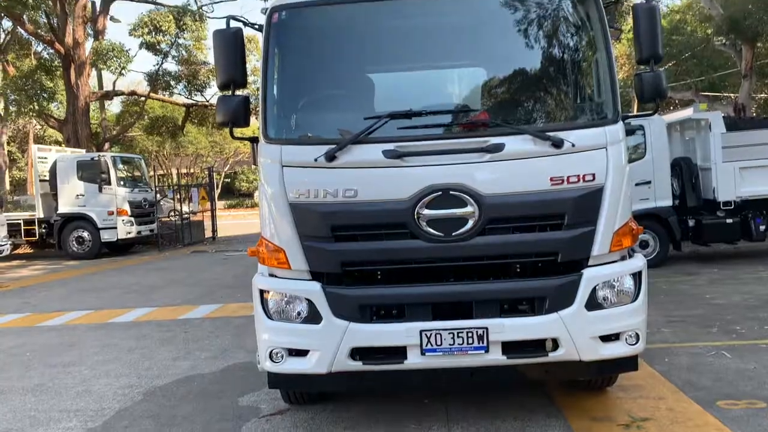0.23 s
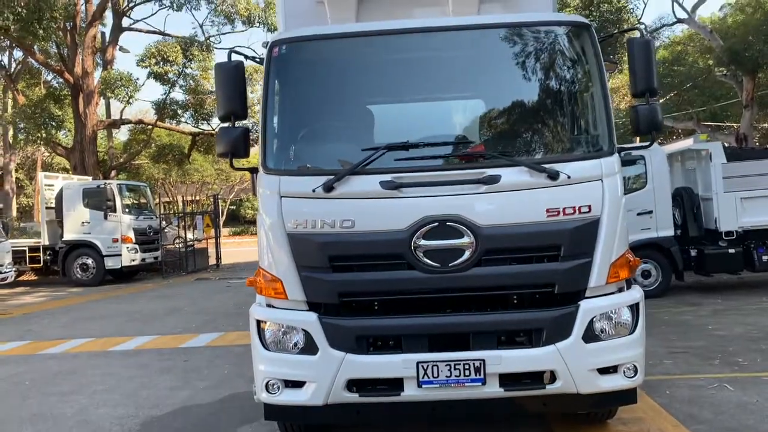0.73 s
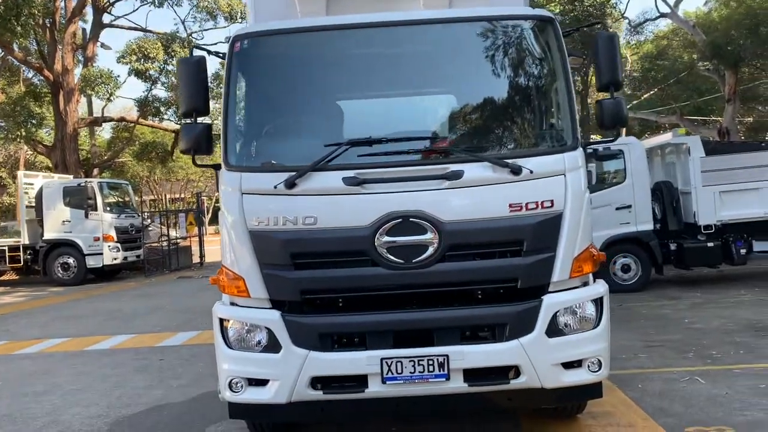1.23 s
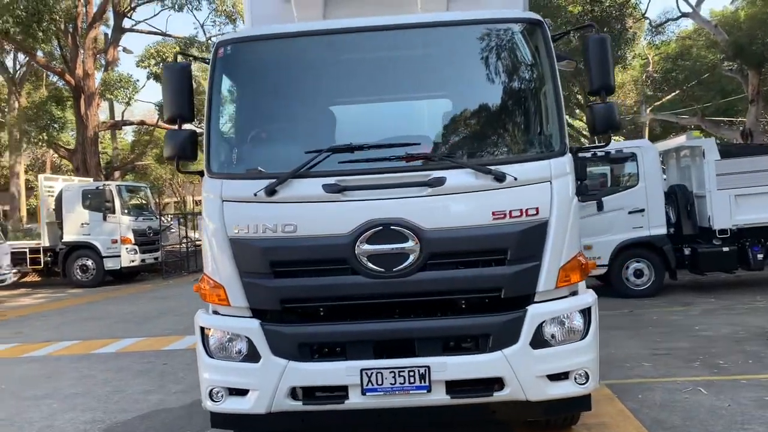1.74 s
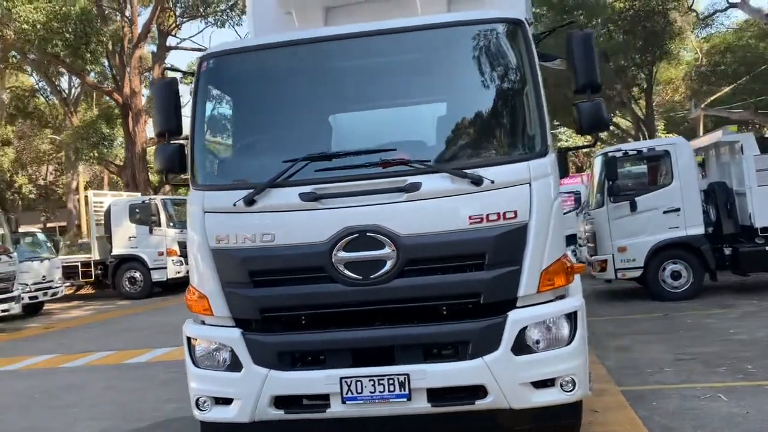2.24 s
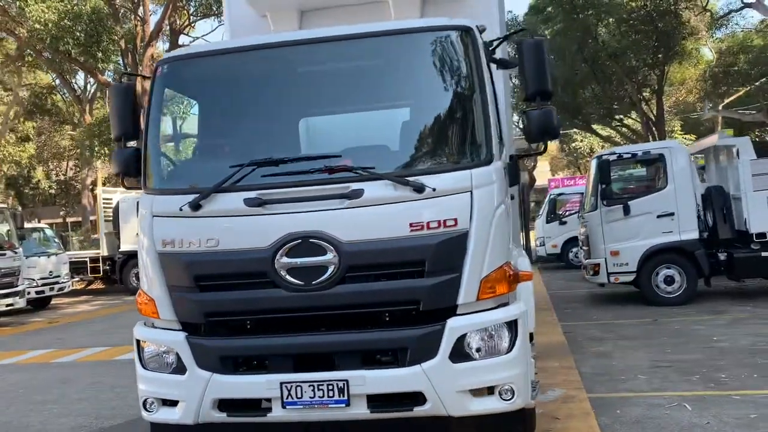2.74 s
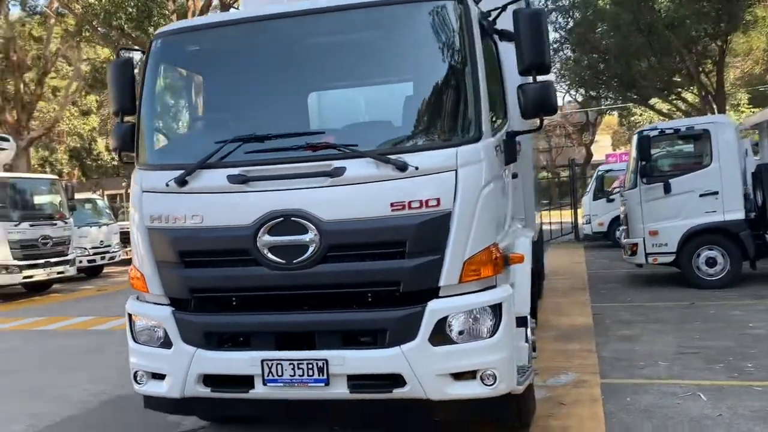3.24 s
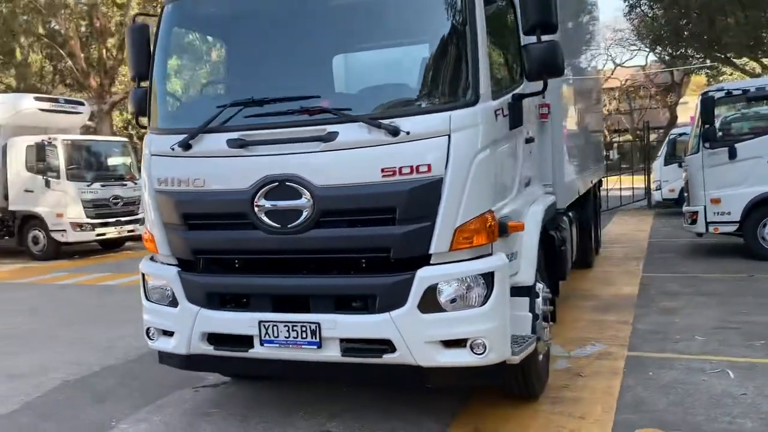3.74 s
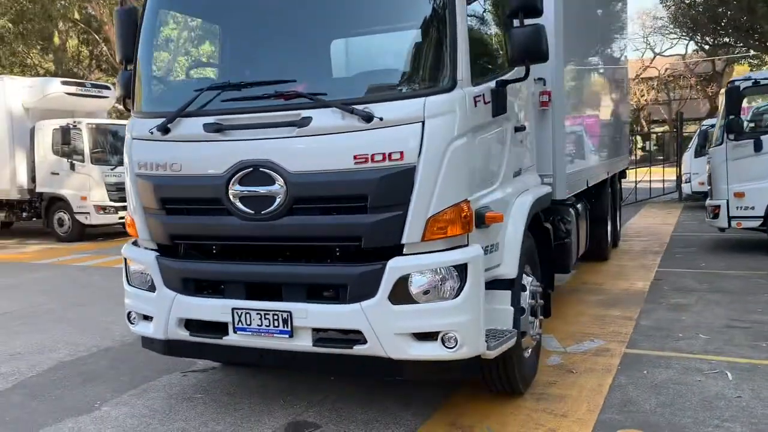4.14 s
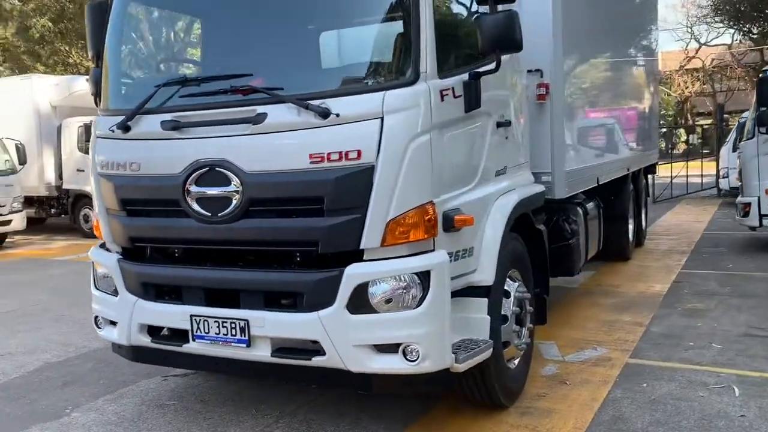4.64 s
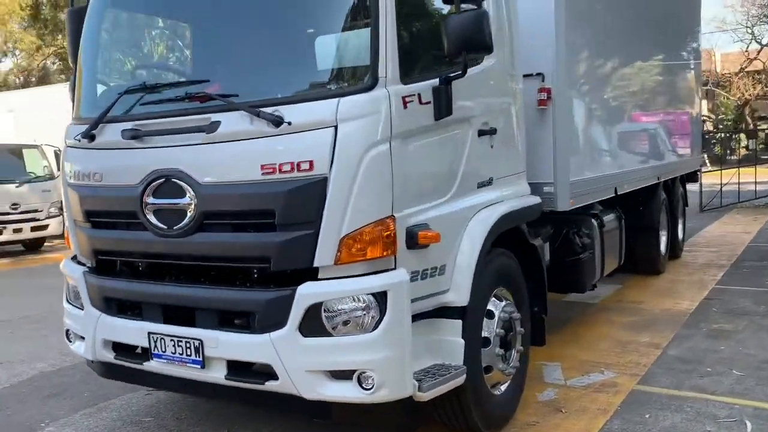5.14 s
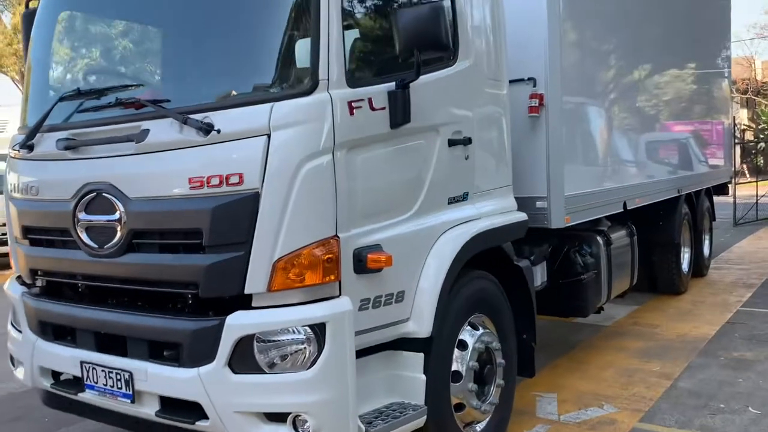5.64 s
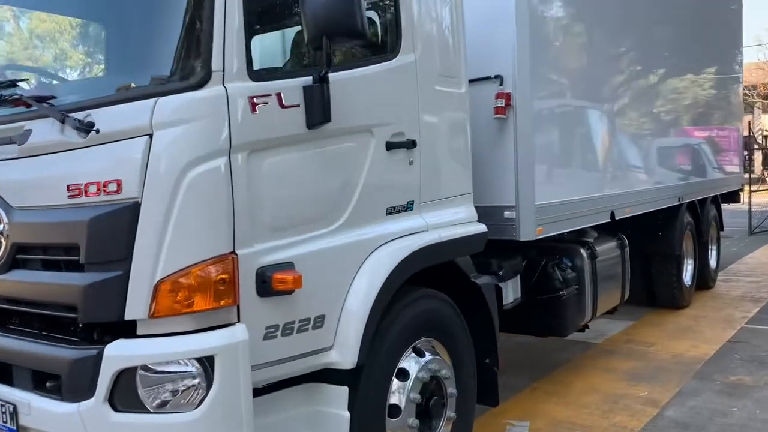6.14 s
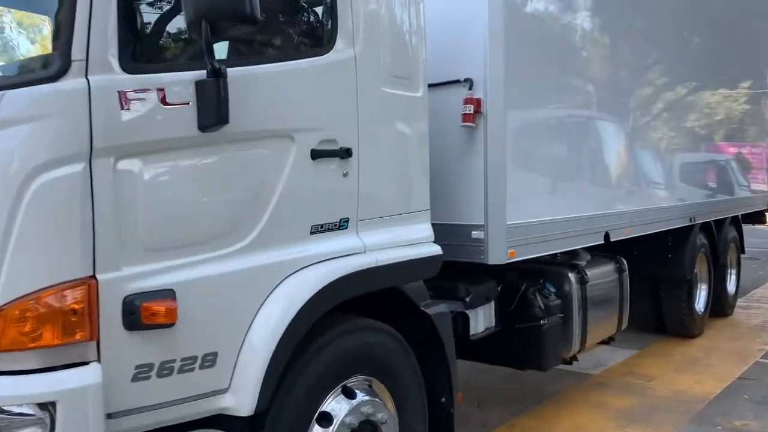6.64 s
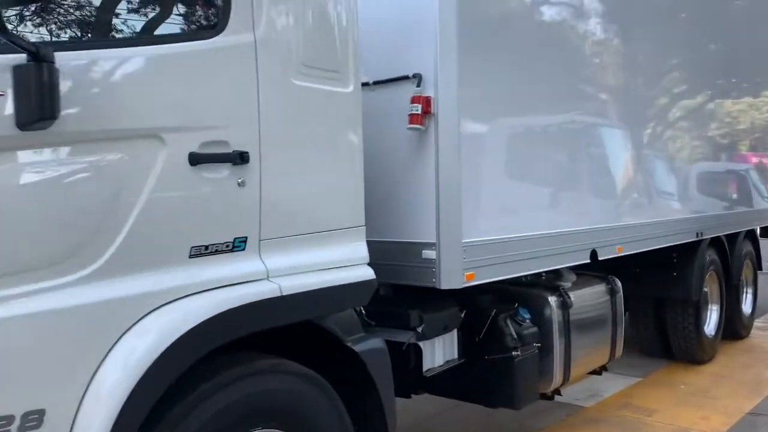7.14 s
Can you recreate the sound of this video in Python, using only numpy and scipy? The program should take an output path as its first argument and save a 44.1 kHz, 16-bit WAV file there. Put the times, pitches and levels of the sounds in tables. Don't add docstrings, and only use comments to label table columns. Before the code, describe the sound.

After a tiny silence, sound opens abruptly on an outdoor truck yard: deep traffic rumble, a light high hiss, a parked diesel idling low and a steady, mellow fan hum with thin belt whines. From about 1.5 s a heavy truck pulls away, its low exhaust boom and dry engine clatter rising in pitch until roughly 4.2 s, strongest around 2.5 to 4. The high hiss thins out from 3.4 to 5 s. Two faint ticks fall at 3.3 and 3.9. At a gear change the pitch sags to 4.8 and the fan hum stops. A short air puff comes at 4.9; the second climb runs 5 to 6.3 with hollow exhaust bark, turbo whistle and gear whine. A sharp close metal tick, slightly right, hits at 5.4, a fainter puff at 5.7. Pitch drops again by 6.9, then the engine pulls anew, with road roar swelling, cut off near 7.4.

```python
import sys
import numpy as np
from scipy import signal
from scipy.fft import rfft, irfft, next_fast_len
from scipy.io import wavfile
from scipy.ndimage import uniform_filter1d, map_coordinates

SR = 44100
rng = np.random.default_rng(int(sys.argv[2]) if len(sys.argv) > 2 else 0)


def gain_from_decibels(decibels):
    exponent = np.asarray(decibels, float) / 20
    return 10 ** exponent


def persist_wave(psi):
    counts = np.round(np.clip(psi, -1, 1) * 32767).astype(np.int16)
    wavfile.write(sys.argv[1], SR, np.atleast_2d(counts).T)


N = 325899

# t/s, firing f/Hz, exhaust boom level/dB,
# exhaust overtone level/dB, engine load level/dB
TRUCK = [(1.45, 51, -18, -20, -52), (1.68, 53.07, -1, -0.5, -56), (2.27, 54, -3.5, -1, -42.5),
         (2.42, 61.64, 0, -2.5, -37.5), (2.85, 66.25, -1, 1, -34), (3, 70.5, -7, 0, -34.5),
         (3.12, 73.52, -2.5, -3.5, -34), (3.6, 80.4, 0, -1, -34.5), (4.121, 84.6, -2.5, -9, -33.5),
         (4.26, 84.44, -25, -11.5, -38), (4.8, 71.89, -27, -12, -42.5), (5.1, 72.7, -6.5, -1, -38),
         (5.55, 78.2, -12.5, 0.5, -37.5), (6.15, 85.8, -13.5, 1, -39.5), (6.4, 85.55, -28, -19, -40),
         (6.85, 71, -21, -19.5, -44), (7.201, 73.83, -21, 0.5, -43.5), (7.39, 73.1, -5.5, -2, -43)]


def unit(x):
    return x / np.sqrt(np.mean(x ** 2) + 1e-20)


def along(points, hz):
    f, v = np.transpose(points)
    return np.interp(np.log(hz + 1), np.log(f + 1), v)


def curves(rows):
    s, *cols = np.transpose(rows)
    return [np.interp(np.arange(N) / SR, s, c) for c in cols]


def finely(rows):
    s, *cols = np.transpose(rows)
    t = np.arange(s[0], s[-1] + .01, .02)
    return [t] + [np.interp(t, s, c) for c in cols]


def wobble(rate, count=N):
    steps = np.arange(0, count + 16, 16)
    knots = rng.standard_normal(int(count * rate / SR) + 4)
    coarse = map_coordinates(knots, [steps * rate / SR])
    return np.interp(np.arange(count), steps, coarse)


def filtered(x, response):
    m = next_fast_len(N + SR // 4)
    return irfft(rfft(x, m) * response(np.fft.rfftfreq(m, 1 / SR)), m)[..., :N]


def modes(rows):
    def response(f):
        total = 0
        for k, (centre, width, db) in enumerate(rows):
            damping = 1j * f * width
            total = total + (-1) ** k * gain_from_decibels(db) * damping / (centre * centre - f * f + damping)
        return total
    return response


def patchy(patchy_db):
    z = signal.stft(rng.standard_normal((2, N)), nperseg=1024)[2]

    def smooth(bins, frames):
        grain = uniform_filter1d(rng.standard_normal(z.shape[1:]), size=bins, axis=0)
        return unit(uniform_filter1d(grain, size=frames, axis=1))
    gain = gain_from_decibels(patchy_db * smooth(12, 4) + 2.45 * smooth(2, 14))
    return signal.istft(z * gain, nperseg=1024)[1][:, :N]


def shaped(spectrum):
    return unit(filtered(patchy(0.96), lambda f: gain_from_decibels(along(spectrum, f))))


def drone(rows, drift_hz, flutter_db, flutter_rate):
    s, *cols = np.transpose(rows)
    span = np.arange(max(int((s[0] - .04) * SR), 0), min(int((s[-1] + .04) * SR), N))
    t, out = span / SR, np.zeros(N)
    hz, *levels = (np.interp(t, s, c) for c in cols)
    shake = lambda: wobble(flutter_rate, count=len(span))
    turn = 2 * np.pi * np.cumsum(hz + drift_hz * shake()) / SR
    tones = sum(gain_from_decibels(db + flutter_db * shake()) * np.sin((k + 1) * turn) for k, db in enumerate(levels))
    to_end = t[-1] - t + (span[-1] == N - 1)
    out[span] = np.sqrt(2) * tones * np.clip(np.minimum(t - t[0], to_end) / 0.083, 0, 1)
    return out


def clatter(firing_hz, body, depth):
    cycle = np.cumsum(firing_hz + 3 * wobble(22)) / SR % 1
    knock = 1 + depth * gain_from_decibels(3.9 * wobble(40)) * np.exp(-cycle / 0.75)
    return unit(filtered(knock * patchy(2.0), lambda f: modes(body)(f) * f ** 2 / (f ** 2 + 1200 ** 2)))


def air_hiss():
    # t/s, level/dB
    air = [(0, -59), (2.1, -59), (2.35, -55.5), (3.05, -52), (3.45, -67.5), (4.2, -76), (5.05, -74),
           (5.35, -55), (6.3, -56.5), (7.39, -56)]
    # f/Hz, level/dB per Hz
    fizz = [(5000, -25), (7500, 2), (9500, 0), (12000, -3.5), (13500, -4), (14500, -5), (15700, -19)]
    return gain_from_decibels(curves(air)[0] + 0.5 + 0.41 * wobble(2.77)) * shaped(fizz)


def road(gust):
    # t/s, level/dB
    passage = [(0, -34.5), (.8, -34.5), (1.05, -32), (1.5, -34), (2, -32), (2.35, -30.5), (2.75, -28.5),
               (3.1, -29), (4.1, -29.5), (4.4, -30.5), (4.8, -31.5), (5.45, -27.5), (6, -26.5),
               (6.35, -27.5), (6.95, -30.5), (7.39, -27)]
    # f/Hz, level/dB per Hz
    rumble = [(15, -31), (30, -43), (45, -8), (65, 5), (100, 0.5), (150, -6.5), (220, -11), (320, -27.5),
              (500, -63)]
    roar = [(150, -0.5), (250, -3.5), (400, -2.5), (600, -5.5), (1000, -4.5), (1400, -11), (2200, -19.5),
            (3000, -78)]
    hiss = [(1500, -20.5), (2800, 2.5), (3300, 4), (3900, -4.5), (4700, -1), (5500, -4), (7000, -10.5),
            (8500, -19), (10500, -33), (11500, -48)]
    roar_db, = curves(passage)
    swing_db = roar_db + 31
    rumble_db = -27.5 + 0.61 * swing_db + 1.9 * wobble(4.5)
    hiss_db = -44 + 0.76 * swing_db + 0.3 * gust
    return (gain_from_decibels(rumble_db) * shaped(rumble) + gain_from_decibels(roar_db + 1.0 + 0.86 * gust) * shaped(roar)
            + gain_from_decibels(hiss_db) * shaped(hiss))


def swell(s, length, first_hz, last_hz, db):
    share = np.array([0, 0.38, 0.62, 1])
    level_db = db - 10.5 * np.array([1, 0, 0, 1])
    return np.transpose([s + share * length, first_hz + share * (last_hz - first_hz), level_db])


def passing_tones():
    passing = [(0.081, 1.36, 60.5, 61, -31.5), (.85, 0.35, 204, 205.8, -34.5), (0.852, .4, 47, 47, -35),
               (2.379, 0.63, 226, 240.1, -34.5), (4.48, .35, 72.4, 65.2, -29), (0.881, 0.24, 66, 68, -30),
               (3.648, .55, 107, 113.2, -28.5), (4.153, 0.75, 113, 104, -31.5), (5, 1.4, 234, 287, -37.5),
               (5.8, 0.31, 312, 310, -32.5), (6.419, 0.48, 126, 114.2, -26),
               (6.9, 0.23, 113.5, 111.9, -24.5)]
    return sum(drone(swell(*row), drift_hz=0.78, flutter_db=4.3, flutter_rate=8) for row in passing)


def valve():
    # t/s, level/dB, f/Hz, width/Hz, length t/s
    puffs = [
        (4.932, -41, 4220, 700, 0.069),
        (4.935, -50, 6470, 5000, .07),
        (5.66, -51, 3600, 1500, .04),
    ]
    out, t = np.zeros(N + SR), np.arange(SR // 6) / SR
    for s, db, hz, width_hz, length in puffs:
        noise = rng.standard_normal(N)
        jet = unit(filtered(noise, lambda f: modes([(hz, width_hz, 0)])(f) ** 2))[:len(t)]
        out[round(s * SR):][:len(t)] += gain_from_decibels(db) * jet * np.clip(t / .004, 0, 1) * np.exp(-(t / length) ** 2)
    return out[:N]


def ticks():
    # t/s, peak level/dB, f/Hz, 60 dB decay t/s
    taps = [
        (3.3008, -36, 2350, .006),
        (3.8909, -38, 4000, .008),
        (5.413, -29, 12500, .004),
        (5.4141, -23, 3700, .008),
        (5.4138, -22, 1300, .012),
        (5.4228, -29, 5500, .006),
    ]
    out, t = np.zeros(N + SR), np.arange(SR // 40) / SR
    for s, db, hz, t60 in taps:
        crack = .42 * rng.standard_normal(len(t)) * gain_from_decibels(-60 * t / .006)
        ring = gain_from_decibels(-60 * t / t60) * np.sin(2 * np.pi * hz * t)
        out[round(s * SR):][:len(t)] += gain_from_decibels(db) * (ring + crack)
    return np.array([out[:N], gain_from_decibels(1) * out[1:N + 1]])


def fan():
    # t/s, level/dB
    hum = [(.08, -31), (2, -32), (2.6, -34.5), (2.85, -34), (3.2, -33), (4.3, -29), (4.5, -30.5),
           (4.7, -42)]
    # f/Hz, level/dB re the fan tone
    thin = [(642, -26), (803.5, -20), (1073, -24), (1549, -28)]

    def line(hz, rel_db, **unsteady):
        return drone([(s, hz, db + rel_db) for s, db in hum], **unsteady)
    whines = sum(line(hz, rel_db, drift_hz=1.4, flutter_db=3.0, flutter_rate=8) for hz, rel_db in thin)
    tone = line(160.8, 0, drift_hz=.3, flutter_db=1, flutter_rate=5)
    octave = line(2 * 160.8, -12.5, drift_hz=.6, flutter_db=2, flutter_rate=5)
    return gain_from_decibels(0.5) * (tone + octave + whines)


def idling_exhaust():
    # t/s, firing f/Hz, level/dB
    idle = [(0, 48, -37.5), (3, 47.8, -33), (3.5, 47.6, -30), (5.6, 47.68, -31), (6.1, 47.87, -33),
            (7.39, 48.4, -40)]
    return drone(idle, drift_hz=0.94, flutter_db=4.5, flutter_rate=5)


def idling_clatter():
    # f/Hz, width/Hz, level/dB
    parked = [(1440, 320, -3), (2080, 680, -5), (2640, 210, -2.5), (4900, 88, -15.5)]
    return gain_from_decibels(-42.5) * clatter(48, parked, depth=0.19)


def turbo():
    # t/s, shaft f/Hz, level/dB
    spool = [(2.5, 4674, -59), (3.5, 5875, -54.5), (4.15, 6580, -62), (4.85, 5270, -66), (5.5, 6400, -51.5),
             (5.9, 7250, -53.5), (6.2, 7619, -63), (6.72, 6180, -54), (7, 5700, -56), (7.39, 5550, -53)]
    whistle = drone(spool, drift_hz=165, flutter_db=4, flutter_rate=300)
    s, hz, _ = finely(spool)
    speeding_up = uniform_filter1d(1. * (np.gradient(hz) > 0), size=9)
    octave_db = -69.5 - 14 * speeding_up
    rows = np.transpose([s, 2 * hz, octave_db])
    return whistle + drone(rows, drift_hz=150, flutter_db=3, flutter_rate=250)


def gear_whine():
    # t/s, f/Hz, level/dB
    meshing = [(5.5, 3990, -71), (5.8, 4254, -52), (6.1, 4480, -50), (6.3, 4444, -51), (6.45, 4440, -66)]
    return drone(meshing, drift_hz=55, flutter_db=3, flutter_rate=120)


def injection_pump():
    s, hz, _, _, load_db = finely(TRUCK)
    peak_db = 6 * np.exp(-((hz - 85) / 9.6) ** 2)
    ring_db = -46.5 + 1.33 * (load_db + 34) + peak_db
    return drone(np.transpose([s, 2308 + 0 * s, ring_db]), drift_hz=40.8, flutter_db=2.5, flutter_rate=90)


def pulling_clatter(gust):
    # f/Hz, width/Hz, level/dB
    block = [(1490, 180, -7), (1886, 166, 4), (2374, 275, 1), (2640, 160, -3.5), (3780, 410, -8),
             (4550, 120, -15)]
    firing_hz, _, _, load_db = curves([(0, 67, 0, 0, -43), *TRUCK])
    return gain_from_decibels(load_db - 1.5 + 0.92 * gust) * clatter(firing_hz, block, depth=0.58)


def bark():
    cylinders = [-0.5, -4.5, 2.5, -16, -4.5, -8.5]
    # f/Hz, width/Hz, level/dB
    pipe = [(225, 50, 10), (381, 100, -7), (426, 145, -4)]
    firing_hz, _, over_db, _ = curves(TRUCK)
    count = np.floor(np.cumsum(firing_hz + .5 * wobble(14)) / SR).astype(int)
    size = gain_from_decibels(np.take(cylinders, count % 6) + 2.4 * rng.standard_normal(N))
    pulses = size * (np.diff(count, prepend=0) > 0)
    steep = lambda f: modes(pipe)(f) * (f / (f + 150)) ** 4 / (1 + (f / 600) ** 4)
    return gain_from_decibels(-37 + 0.98 * over_db) * unit(filtered(pulses, steep))


def pulling_exhaust():
    # f/Hz, level/dB
    exhaust = [(52, -22.5), (63, -13.5), (84, -18), (106, -25), (140, -30), (165, -33), (195, -31.5),
               (250, -32)]
    s, hz, boom_db, over_db, _ = finely(TRUCK)
    third_db = over_db - 7.5 + .55 * (over_db - boom_db)
    orders = []
    for k, db in enumerate([boom_db, over_db, third_db]):
        echo_db = 1.04 * k * wobble(4.5)[(s * SR).astype(int) - 1]
        orders.append(db + along(exhaust, (k + 1) * hz) + echo_db)
    return drone(np.transpose([s, hz, *orders]), drift_hz=0.65, flutter_db=1.1, flutter_rate=13)


def ports(pair):
    # f/Hz, likeness
    alike = [(40, 0.88), (130, 0.97), (250, 0.77), (380, 0.81), (550, 0.83), (800, 0.63), (1200, 0.73),
             (2200, 0.17), (5500, 0.47), (7500, 0.15), (9000, 0.83), (10600, 0.82), (11300, 0.09),
             (13000, 0.6), (15000, .6)]
    # f/Hz, phase/rad
    lead = [(0, 0), (250, -.6), (650, -2.7), (1000, -2.3), (1400, -3.14), (2200, -6), (2500, -6.3),
            (3400, -9.4), (5300, -15.7), (6600, -18.85), (9000, -15.7), (10900, -15.7), (11900, -12.57)]
    # f/Hz, level/dB
    tilt = [(60, 2), (110, -3.5), (200, -2.5), (380, -3.5), (700, -5), (1290, -1), (2380, 0.5),
            (4400, -0.5), (8120, -0.5), (15000, 0.0)]
    turn = lambda f: np.arccos(np.clip(along(alike, f), 0, 1)) / 2
    same, other = filtered(pair, lambda f: np.array([np.cos(turn(f)), np.sin(turn(f))]))
    half = lambda f: gain_from_decibels(along(tilt, f) / 2) * np.exp(.5j * np.interp(f, *np.transpose(lead)))
    return filtered(np.array([same + other, same - other]), lambda f: np.array([half(f), 1 / half(f)]))


def scene():
    gust = .4 * wobble(4)
    noises = air_hiss() + road(gust) + idling_clatter() + pulling_clatter(gust)
    engines = gain_from_decibels(1.5) * (passing_tones() + idling_exhaust() + pulling_exhaust())
    whistles = turbo() + gear_whine() + injection_pump()
    direct = engines + bark() + fan() + whistles + valve()
    echo = np.roll(direct, 380)
    return ports(noises + np.array([direct, echo])) + ticks()


def low_pass(x):
    return signal.sosfilt(signal.butter(12, 15750, fs=SR, output="sos"), x)


def record(dry):
    heard = filtered(dry, lambda f: (1j * f / (28 + 1j * f)) ** 2 * (f < 15200))
    opening = np.clip((np.arange(N) / SR - .0725) / 0.00057, 0, 1)
    return low_pass(heard * opening)


dry = scene()
out = record(dry)
persist_wave(out)
```